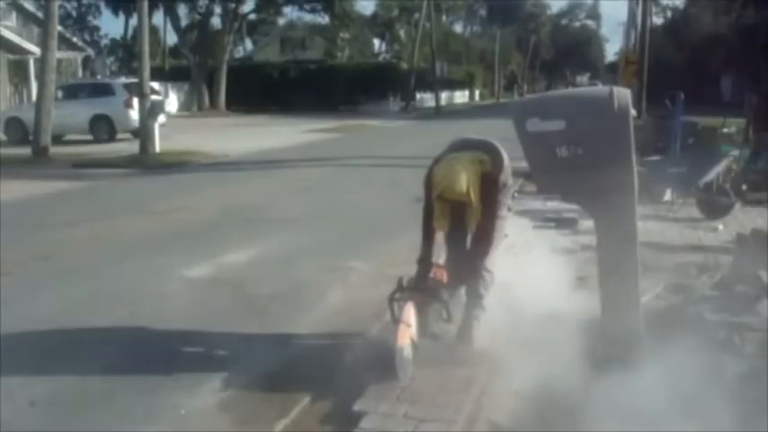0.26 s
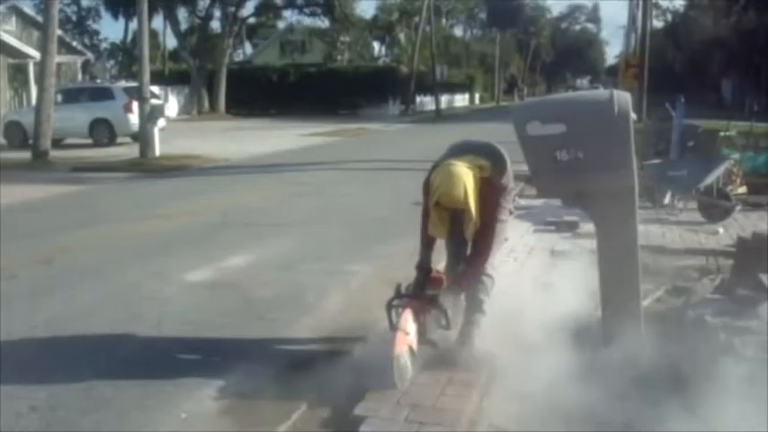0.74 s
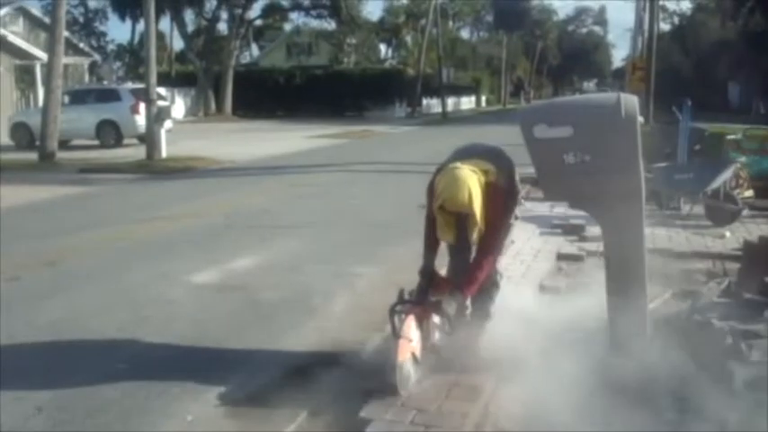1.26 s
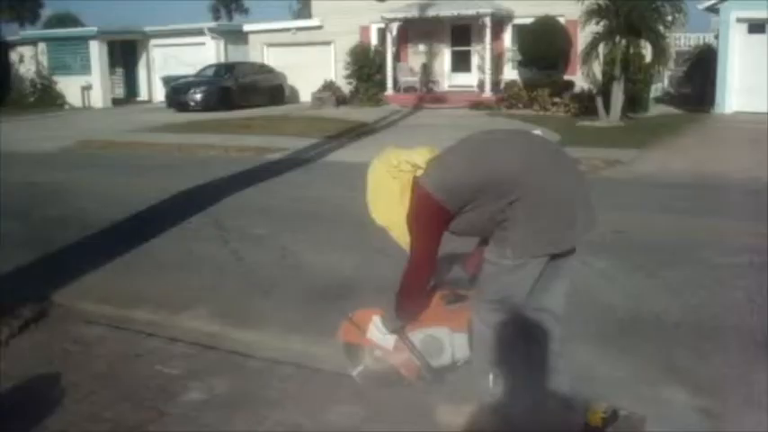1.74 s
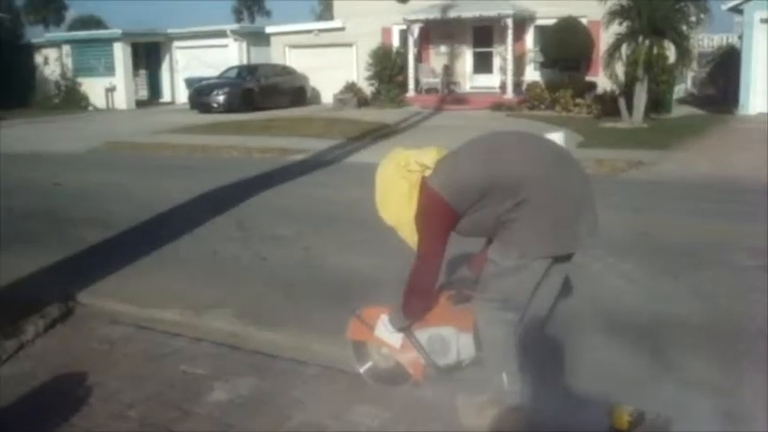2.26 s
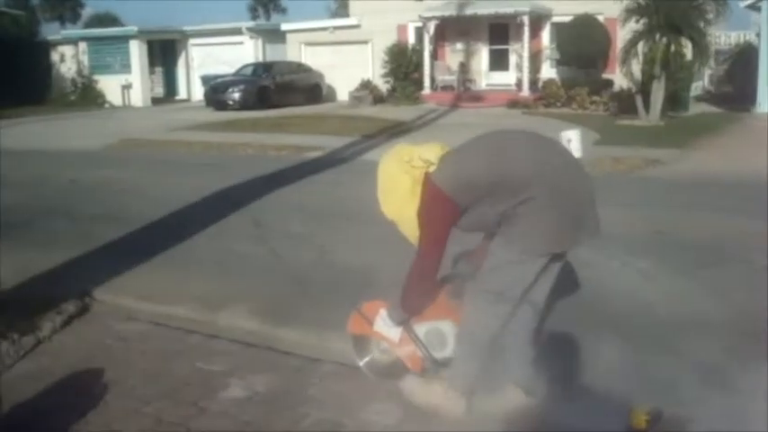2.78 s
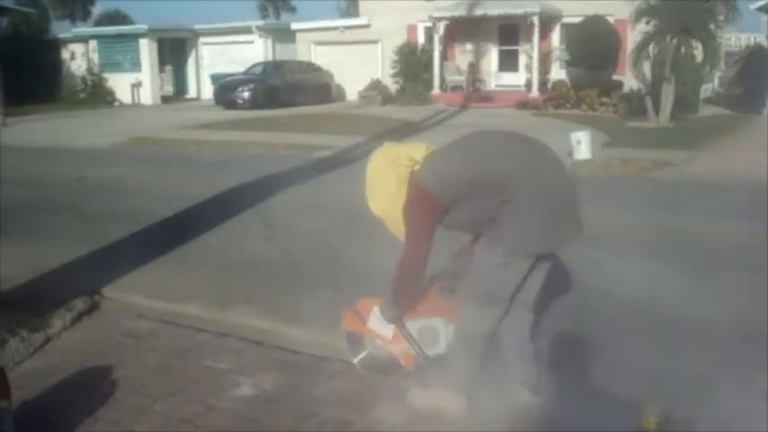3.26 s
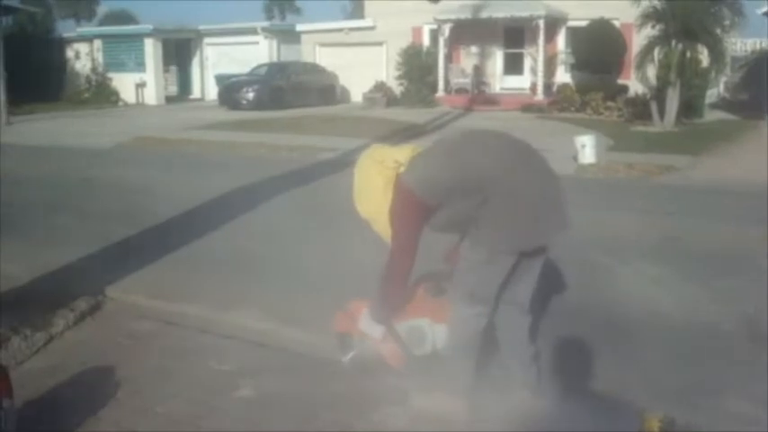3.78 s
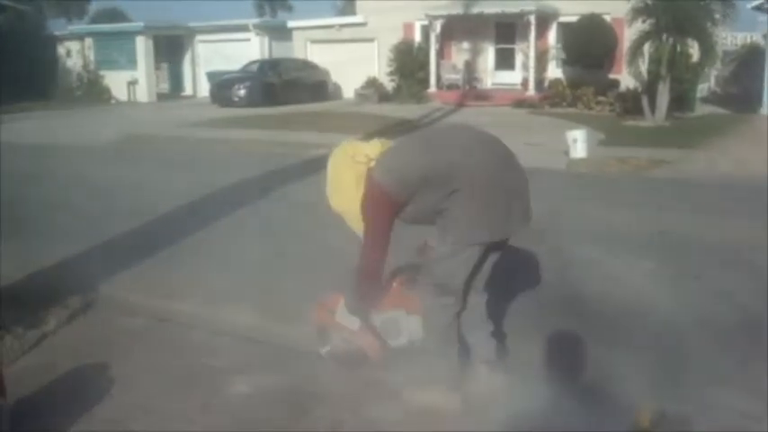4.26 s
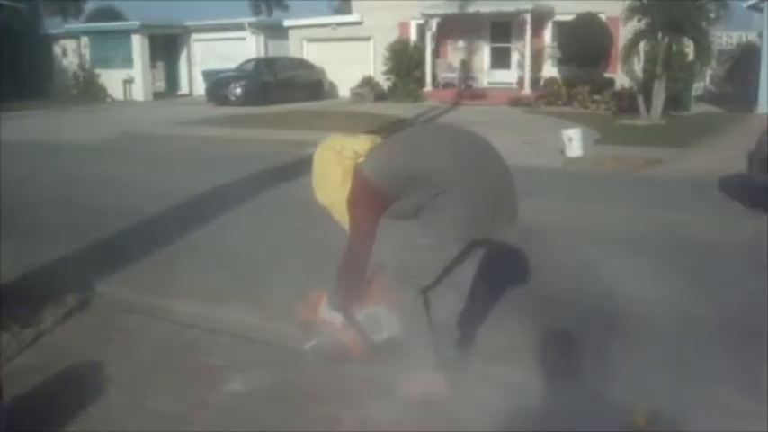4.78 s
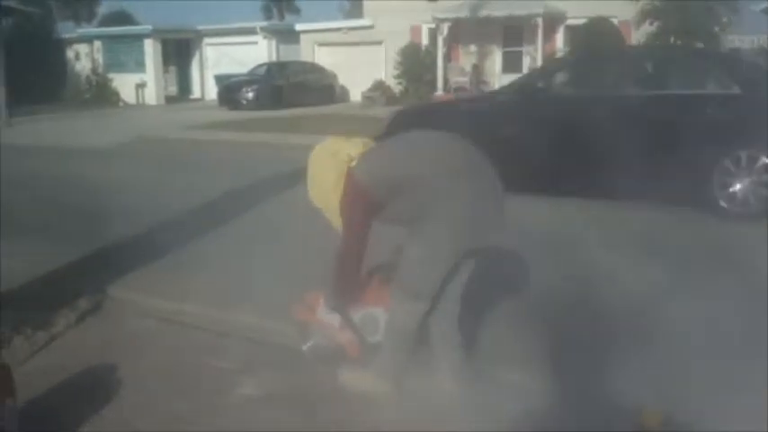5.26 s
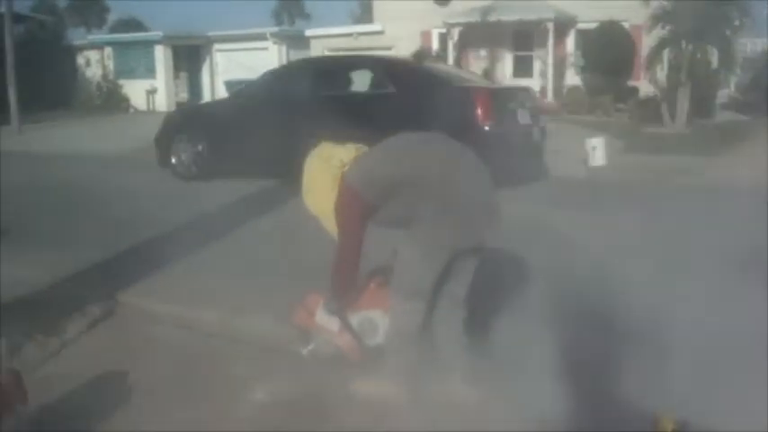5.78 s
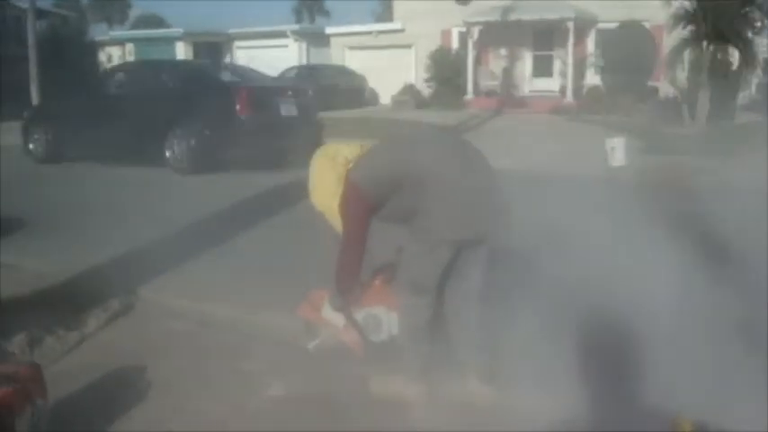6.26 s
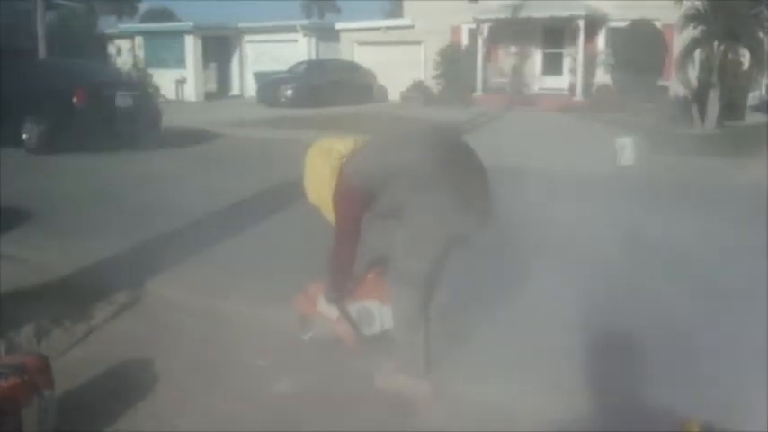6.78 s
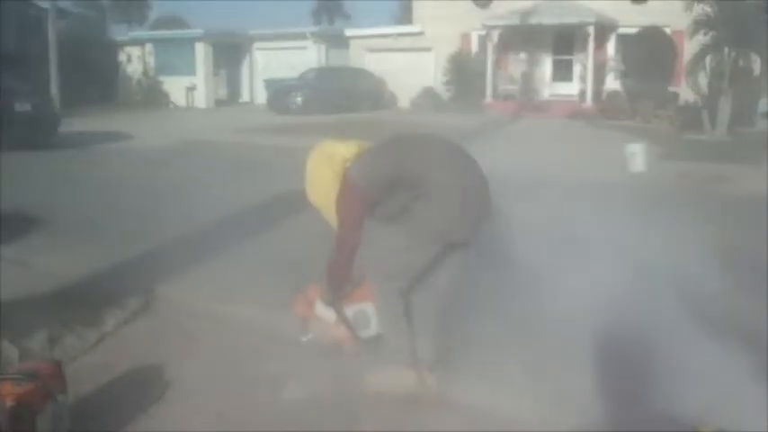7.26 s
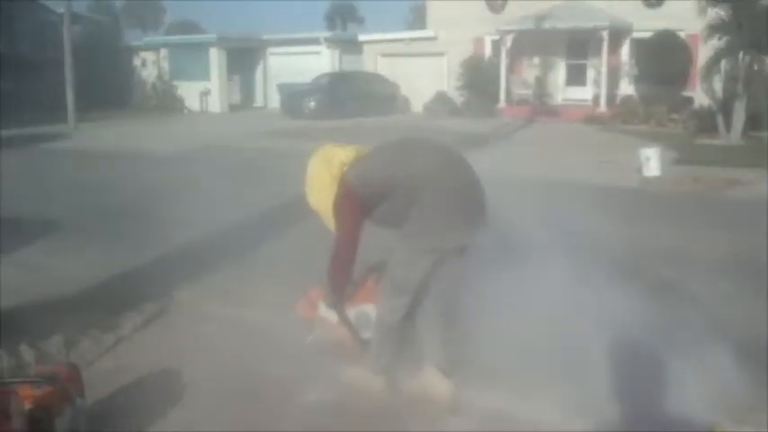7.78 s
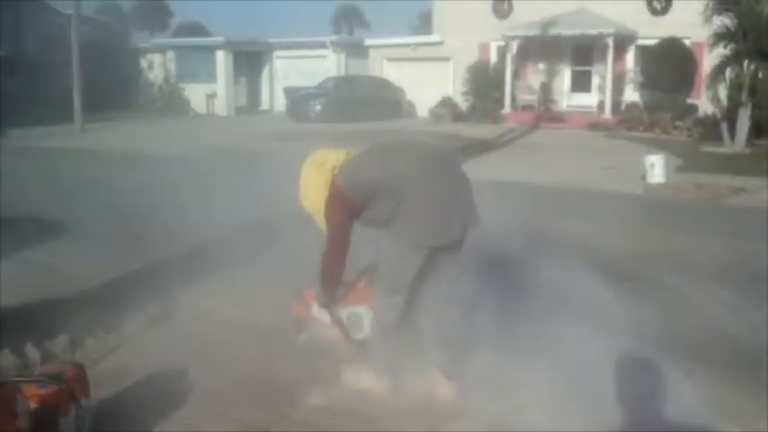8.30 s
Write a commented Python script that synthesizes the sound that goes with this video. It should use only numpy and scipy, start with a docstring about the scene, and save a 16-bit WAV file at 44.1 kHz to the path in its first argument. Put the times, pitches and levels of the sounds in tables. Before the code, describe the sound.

On an open street, a petrol cut-off saw is already running fast and grinding concrete, close to the microphone, with only faint short reflections. From 0 to 1.8 s it is heard from the front: a raspy two-stroke buzz near 110 firings per second, crackling exhaust, dense metallic grinding and screeches around 0.5, 0.65 and 1.5 s. At about 1.8 s the position cuts to the side; the timbre shifts and exhaust cracks soften. The engine repeatedly picks up and sags with a stuttering limiter, about twice a second, while blade screeches and spurts of hissing grit flicker above. After 5.3 s the slot is deeper and the ringing changes colour. A nasal housing howl near 1 kHz strengthens from about 6.2 s. From 7 s the blade thrums lower and revs climb towards 130; a piercing squeal near 4 kHz swells after 8 s. It ends at 8.5 s, still cutting.

```python
"""An open street, where a two-stroke cut-off saw grinds through concrete; the microphone is in front, then beside it.
The engine picks up and sags as its limiter drops sparks: tones, gas noise and cracks follow each firing.
Noisy grinding force rings resonances of the steel blade and its guard, and from the side the housing howls.
As the slot deepens the blade starts to thrum and squeal, from sines tied to its spin."""
import sys
import numpy as np
from scipy import signal
from scipy.fft import rfft, irfft, next_fast_len
from scipy.io import wavfile
from scipy.ndimage import uniform_filter1d

SR = 44100
rng = np.random.default_rng(int(sys.argv[2]) if len(sys.argv) > 2 else 0)


def store_wav(level_fs):
    """Save 16-bit WAV to argv[1]."""
    pcm = np.round(np.clip(np.atleast_2d(level_fs), -1, 1) * 32767)
    wavfile.write(sys.argv[1], SR, pcm.T.astype(np.int16))


N = 376162
TIME = np.arange(N) / SR
BELT_RATIO = .3575   # blade turns per firing


def from_db(db):
    """Amplitude factor of a level in dB."""
    return 10 ** (np.asarray(db) / 20)


def rms_one(x):
    """Scales a signal to rms 1."""
    return x / np.sqrt(np.mean(x ** 2) + 1e-20)


def in_time(rows):
    """Each column of a curve, sample by sample."""
    s, *columns = np.transpose(rows)
    return [np.interp(TIME, s, c) for c in columns]


def swells(rows):
    """The level change in dB from a table of (middle, length, dB) events; each comes and goes like a bell."""
    return sum(db * np.exp(-(2 * (TIME - s) / length_s) ** 2) for s, length_s, db in rows)


def drift(rate_hz):
    """Slow random wandering of rms about 1, made at one fortieth of the sample rate."""
    r = np.exp(-80 * np.pi * rate_hz / SR)
    white = rng.standard_normal(N // 40 + 2002)
    slow = signal.lfilter([1], [1, -2 * r, r * r], white)[2000:]   # the settling start is left out
    return np.interp(np.arange(N) / 40, np.arange(len(slow)), rms_one(slow))


def resonate(x, hz, width_hz):
    """One resonance with gain 1 on top."""
    r = np.exp(-np.pi * width_hz / SR)
    feedback = [1, -2 * r * np.cos(2 * np.pi * hz / SR), r * r]
    return signal.lfilter(np.array([1, 0, -1]) * (1 - r * r) / 2, feedback, x)


def resonate_twice(x, hz, width_hz):
    """Two passes give a resonance steep skirts."""
    return resonate(resonate(x, hz, width_hz), hz, width_hz)


MOVE_S = 1.79   # the microphone's place changes from front to side


def by_place(front, side):
    """The front value until the microphone's place changes, the side value after, with a 22 ms crossfade."""
    moved = np.clip((TIME - MOVE_S) / 0.022 + .5, 0, 1)
    return front + (side - front) * moved


def coloured(white, spectrum):
    """Gives unit white noise the spectrum that is heard at each microphone place."""
    hz, *columns = np.transpose(spectrum)
    size = next_fast_len(N)
    log_hz = np.log(np.arange(size // 2 + 1) * SR / size + 1)
    bins = rfft(white, size) * np.sqrt(SR / 2)
    gains = [from_db(np.interp(log_hz, np.log(hz), levels)) for levels in columns]
    return by_place(*[irfft(bins * gain, size)[:N] for gain in gains])


def bounced(x, echo=0.23, sway_s=.00006):
    """Reflections from road, kerb and body, on paths some 0.8 to 4.5 m longer; their ripples shift as the saw sways."""
    delays_s = (.0023, .0043, .0079, .0132)
    echoes = np.zeros(N)
    for delay in delays_s:
        lag = np.round((delay + sway_s * drift(1.5)) * SR).astype(int)
        echoes += x[np.arange(N) - lag]
    return (x + echo * echoes) / np.sqrt(1 + len(delays_s) * echo ** 2)


# surges of the engine, which sags on its limiter from each one to the next:
# (start [s], length [s], firing rate at start [Hz], firing rate at end [Hz]), before smoothing
ENGINE_SURGES = [(0.15, 0.1, 110.2, 112.2), (0.57, 0.2, 111.2, 114.4), (1.03, 0.39, 112.4, 115.5),
                 (1.76, 0.1, 112.2, 117.1), (2.07, 0.28, 114.9, 120.2), (2.73, 0.33, 116.6, 119.8),
                 (3.41, 0.19, 117.7, 120.2), (3.89, 0.29, 116.6, 121.2), (4.63, 0.24, 115.9, 120.1),
                 (5.13, 0.27, 117.3, 120.8), (5.71, 0.24, 118.4, 121.0), (6.27, 0.3, 117.6, 122.5),
                 (6.75, 0.22, 120.9, 124.9), (7.25, 0.54, 121.3, 127.6), (8.06, 0.35, 124.6, 130.6)]
FLYWHEEL_S = .05


def crankshaft():
    """Firings per s: a straight climb through each surge, a straight sag to the next, rounded by the flywheel."""
    corners = []
    for s, length_s, from_hz, to_hz in ENGINE_SURGES:
        corners += [(s, from_hz), (s + length_s, to_hz)]
    return uniform_filter1d(in_time(corners)[0], size=int(FLYWHEEL_S * SR))


def firing_strength(turns, pull, skip=0.82, rough=0.045):
    """Strength of each firing: as the engine sags, the limiter weakens about every third one by a dropped spark."""
    cycle = turns.astype(int)
    dropped = np.zeros(4096)
    gaps = rng.choice([2, 3, 4], 1000, p=[.03, .94, .03])   # firings from one drop to the next
    dropped[np.cumsum(gaps)] = 1
    limiting = np.clip(.4 - pull, 0, 1)
    unevenness = 1 + rough * rng.standard_normal(len(dropped))[cycle]
    strength = (1 - skip * limiting * dropped[cycle]) * unevenness
    return rms_one(uniform_filter1d(strength, size=150))


def muffler(hz=598, width_hz=16, front_db=-51, side_db=-59):
    """Gas keeps the muffler's cavity humming at its own fixed pitch: noise through a narrow resonance."""
    hum = resonate_twice(rng.standard_normal(N), hz, width_hz)
    return rms_one(hum) * by_place(from_db(front_db), from_db(side_db))


# how hard the engine shakes the housing, before a slow waver: (time [s], level [dB])
HOUSING_SHAKE = [(1.8, -47), (2.15, -44.5), (2.55, -41), (3.05, -52), (3.75, -47), (4.42, -39), (4.8, -50),
                 (5.9, -42), (6.25, -35), (6.95, -36.5), (7.45, -38.5), (7.8, -36.5), (8.53, -39)]
HOUSING_HZ = 986
HOWL_ORDER, SIDE_TONE_ORDER = 8, 8 + 1 / 3   # multiples of the firing rate


def housing(turns, pull, width_hz=28, eighth_db=3, rattle_db=-51, waver_db=1.0):
    """From the side, a sharp resonance howls as the eighth order, or the side tone of dropped sparks, sweeps through."""
    firing = np.clip(.5 + pull, 0, 1)
    eighth = from_db(eighth_db) * (1 + firing) / 2 * np.sin(2 * np.pi * HOWL_ORDER * turns)
    side_tone = (1 - firing) * np.sin(2 * np.pi * SIDE_TONE_ORDER * turns)
    shake = from_db(in_time(HOUSING_SHAKE)[0] + waver_db * drift(4.4))
    drive = np.sqrt(2) * (eighth + side_tone) * shake
    ring = resonate_twice(drive, HOUSING_HZ, width_hz)
    rattle = resonate_twice(rng.standard_normal(N), HOUSING_HZ, width_hz)
    return by_place(0, ring + from_db(rattle_db) * rms_one(rattle))


# exhaust tones, before load and trim: (multiple of the firing rate, front level [dB], side level [dB])
EXHAUST_TONES = [(1, -68, -68.5), (2, -57.5, -61), (3, -61, -58.5), (4, -54.5, -54.5), (5, -49.5, -47),
                 (6, -46, -64.5), (7, -55.5, -53.5), (8, -57, -50.5), (9, -53.5, -52), (10, -53.5, -58.5),
                 (11, -66.5, -75), (12, -60, -63), (13, -58, -58), (14, -64, -53.5), (15, -60, -74),
                 (16, -67, -51), (17, -64, -55), (18, -55, -54), (19, -71, -49.5), (20, -73, -50)]
# rush of exhaust gas and cooling air, before trim:
# (frequency [Hz], front level [dB per Hz], side level [dB per Hz])
GAS_RUSH = [(25, -102, -108), (80, -100, -102), (161, -90, -88), (221, -88, -91), (292, -75, -80.5),
            (360, -87, -84.5), (503, -72.5, -78.5), (648, -70.5, -72.5), (710, -64.5, -71),
            (834, -75.5, -73.5), (890, -68.5, -70.5), (1140, -77.5, -79), (1370, -74, -87.5),
            (3000, -105, -105)]
# brief swells of the exhaust rush, and one slight dip: (middle time [s], length [s], level change [dB])
RUSH_SWELLS = [(0.38, .08, 3.5), (1.28, .15, 1.5), (1.59, 0.062, 2.5), (3.68, 0.068, -1), (4.42, .15, 0.5),
               (6.15, 0.28, 3.5), (7.15, .08, 1), (7.88, 0.17, 3), (8.11, .1, 3.5)]


def engine(turns, strength, pull, clean_db=-0.4, load_swing_db=2.0, tones_db=0.55, rush_db=-0.33,
           bang_db=1.76, sag_rush_db=0.8, rush_db_per_s=0.44):
    """Exhaust tones, the low ones fullest while the engine pulls, over a rush of gas that puffs with each firing."""
    tones = np.zeros(N)
    load_share = {2: .6, 3: 1.5, 4: .6}   # the second to fourth orders swing most with the load
    for order, front_db, side_db in EXHAUST_TONES:
        wave = np.sin(2 * np.pi * (round(order) * turns + rng.random()))
        swing_db = pull * (clean_db + load_swing_db * load_share.get(round(order), 0))
        tones += wave * by_place(from_db(front_db), from_db(side_db)) * from_db(swing_db + drift(2.5))
    # now and then a charge of unburnt fuel makes one puff bang
    charge = np.minimum(rng.exponential(1, 4096), 3.5)[turns.astype(int)]
    port_open = np.sin(np.pi * turns) ** 8
    gas = rms_one(from_db(port_open * strength * (2.5 + bang_db * charge)))
    rush = coloured(rng.standard_normal(N) * gas, GAS_RUSH)
    # the rush grows through the cut, rises in each sag, and briefly swells or dips
    growth_db = rush_db_per_s * (TIME - TIME.mean())
    level_db = rush_db + growth_db - sag_rush_db * pull + swells(RUSH_SWELLS)
    return from_db(tones_db) * strength * tones + from_db(level_db) * rush


def cracks(turns, strength, share=.7, hz=2150, width_hz=1100, length_s=0.00065, size_db=1.0,
           front_db=-41, side_db=-48):
    """Most firings burst from the port with a short, hard crack: decaying noise through a broad resonance."""
    opens = np.diff(np.floor(turns + .5), prepend=0) > 0
    loudness = from_db(size_db * np.minimum(rng.exponential(1, N), 3))
    sizes = opens * (rng.random(N) < share) * strength * loudness
    burst = signal.lfilter([1], [1, -np.exp(-1 / (length_s * SR))], sizes + 1e-18)
    crack = resonate_twice(burst * rng.standard_normal(N), hz, width_hz)
    return rms_one(crack) * by_place(from_db(front_db), from_db(side_db))


USUAL_FIRING_HZ = 119


def spun(x, turns, rise_per_hz=.001):
    """A wave that runs with the spin rises in pitch as the engine speeds up."""
    return np.interp(TIME + rise_per_hz * (turns - USUAL_FIRING_HZ * TIME), TIME, x)


# thrum of the slightly warped blade: (multiple of the blade's turning rate, level once pinched [dB])
BLADE_THRUM = [(2, -71), (4, -69), (6, -80), (8, -75)]
# squeal of the blade pinched in the slot: (time [s], level [dB])
BLADE_SQUEAL = [(0, -83), (7.3, -65.5), (7.8, -58), (8.1, -43.5), (8.3, -38), (8.48, -39), (8.53, -31.5)]


def pinched_blade(turns, start_s=6.9, rise_s=0.89):
    """Deep in the slot the blade thrums at even multiples of its turning, and friction sustains a travelling wave."""
    thrum = np.zeros(N)
    for multiple, db in BLADE_THRUM:
        cycles = round(multiple) * BELT_RATIO * turns + rng.random()
        thrum += from_db(db) * np.sin(2 * np.pi * cycles)
    squeal_hz = TRAVELLING_WAVES[0][0] + 7 * drift(40)   # the lowest wave, slightly unsteady
    squeal = np.sin(2 * np.pi * np.cumsum(squeal_hz) / SR) * from_db(3.0 * drift(25))
    pinch = (1 + np.tanh((TIME - start_s) / rise_s)) / 2
    return np.sqrt(2) * thrum * pinch + spun(rms_one(squeal), turns) * from_db(in_time(BLADE_SQUEAL)[0])


def puffs(turns, sharpness):
    """One rounded burst a turn, rms 1."""
    return rms_one(np.exp(sharpness * np.cos(2 * np.pi * turns)))


SEGMENT_COUNT = 16   # cutting segments on the rim


def contact(blade_turns, turns, segment_depth=0.21, firing_depth=0.16, warp_depth=0.041, judder_db=0.85,
            chips_per_s=45, chip_db=1.5, chip_s=0.0014):
    """Grinding force: segments strike in turn, firings and the blade's warp jerk the rim, and chips break out."""
    sizes = np.minimum(rng.exponential(1, N), 4) * (rng.random(N) < chips_per_s / SR)
    chips = signal.lfilter([1], [1, -np.exp(-1 / (chip_s * SR))], sizes + 1e-18)
    segments = puffs(SEGMENT_COUNT * blade_turns, segment_depth)
    beat = segments * puffs(blade_turns, warp_depth) * puffs(turns, firing_depth)
    return rms_one(beat * from_db(judder_db * drift(43) + chip_db * chips))


DEEP_S = 5.28   # the blade sinks deep into the slot


def ringing(force, modes, wander_db):
    """Grit excites every mode; each swells and fades as the contact point shifts."""
    depth = np.clip(TIME - DEEP_S + .5, 0, 1)
    out = np.zeros(N)
    for hz, width_hz, front_db, shallow_db, deep_db in modes:
        ring = resonate_twice(force * rng.standard_normal(N), hz, 1.25 * width_hz)
        ring = ring * (1 + (from_db(wander_db) - 1) * drift(9.0))
        side = from_db(shallow_db) + (from_db(deep_db) - from_db(shallow_db)) * depth
        out += rms_one(ring) * by_place(from_db(front_db), side)
    return out


# standing modes of the steel blade; ringing() widens them, and feed and trims shift the levels:
# (frequency [Hz], width [Hz], front level [dB], side level in a shallow slot [dB], in a deep slot [dB])
BLADE_MODES = [(2945, 103, -38, -41, -41), (3100, 56, -38, -40, -42), (3190, 51, -48, -40, -36),
               (3285, 25, -45, -46, -41), (3325, 47, -44, -45, -40), (3436, 22, -43, -44, -43),
               (3512, 75, -36, -54, -59), (3654, 44, -60, -47, -45), (3732, 110, -47, -41, -41),
               (3938, 22, -52, -47, -44), (3974, 21, -41, -47, -45), (4048, 47, -54, -43, -46),
               (4483, 21, -53, -42, -44), (4558, 31, -47, -41, -45), (4839, 38, -48, -42, -41),
               (5308, 35, -39, -39, -54), (5348, 28, -46, -43, -45), (5526, 53, -58, -52, -46),
               (6213, 39, -58, -56, -48), (6466, 30, -45, -49, -51), (6636, 103, -59, -49, -45),
               (7360, 110, -40, -49, -47), (7680, 45, -49, -50, -52), (7896, 64, -54, -52, -49),
               (8308, 33, -51, -51, -49), (8605, 79, -58, -50, -46)]
# modes of the blade guard, same columns
GUARD_MODES = [(1771, 86, -45.5, -44.5, -43.5), (1939, 110, -43.5, -48, -45), (2263, 51, -48, -50, -51),
               (2459, 104, -48, -45, -45), (2648, 99, -51, -46, -44)]
# waves that run round the blade with its spin, same columns, at the usual engine speed
TRAVELLING_WAVES = [(4125, 24, -43, -47, -42), (4649, 52, -34, -38, -37), (5149, 53, -38, -36, -40),
                    (5796, 110, -37, -41, -38)]
# rasp of crushed concrete, before feed: (frequency [Hz], front level [dB per Hz], side level [dB per Hz])
CONCRETE_RASP = [(960, -105, -105), (1580, -86, -73), (2050, -73, -94), (2860, -68.5, -67.5),
                 (3400, -66, -66.5), (4380, -61.5, -71.5), (5320, -61, -64.5), (7100, -91, -100)]
# hiss of flying grit, same columns
GRIT_SPRAY = [(3900, -108, -100), (5600, -62.5, -76), (5930, -62, -68.5), (6850, -64, -69),
              (7800, -62, -69.5), (8600, -66.5, -69), (9930, -68, -66.5), (10180, -93, -87.5)]
# steady grinding as the slot deepens, before trims:
# (time [s], bite of the rim [dB], rub of the blade's flank [dB], spray of grit [dB])
STEADY_FEED = [(0.0, 0.5, -5.5, -4.5), (1.7, -0.1, -1.5, -3), (1.9, 0.3, -2, -5.5), (3.5, 0, -0.5, -5),
               (3.8, 1, -1, -2), (5.1, 0.5, -1.5, -3.5), (5.5, 0.8, 0, -4), (6.75, 0.3, -2, -2.9),
               (8.53, 0.8, 2.3, -2.5)]
# the rim bites harder: (middle time [s], length [s], added level [dB])
RIM_BITES = [(0.43, 0.21, 1), (0.646, 0.071, 2), (0.78, .08, 2), (1.093, 0.33, 2), (1.464, 0.47, 1.8),
             (2.307, .14, 1.5), (3.725, 0.051, 2), (4.27, .11, 0.9), (6.068, 0.21, 1.5), (7.02, 0.059, 1.5),
             (8.52, 0.037, 3.5)]
# the blade's flank screeches against the wall of the slot, same columns
FLANK_SCREECHES = [(0.18, .07, 3), (0.46, 0.17, 6), (0.65, 0.2, 9), (1.176, 0.065, 6), (1.522, .05, 8),
                   (1.914, 0.18, 9.5), (2.242, 0.13, 5.5), (2.408, 0.15, 5), (3.153, 0.078, 6),
                   (3.892, 0.22, 6.5), (4.23, 0.092, 4), (4.387, 0.083, 3.5), (4.7, .12, 0.5),
                   (5.05, .14, 2.5), (5.272, .13, 4.5), (5.62, .06, 5.5), (5.972, .11, 4.5),
                   (6.39, 0.042, 4), (6.57, 0.12, 4.5), (6.828, 0.1, 4.5), (7.067, 0.14, 2),
                   (7.36, 0.042, 4.5), (7.61, 0.053, 3), (8.076, .07, 3.5), (8.52, 0.064, 1)]
# spurts of grit leave the slot, same columns
GRIT_SPURTS = [(0.42, .24, 2.5), (0.81, 0.14, 2), (1.25, .05, 1.5), (1.665, .06, 3.5), (3.18, .1, 2.2),
               (3.773, 0.13, 2), (4.464, .13, 2), (4.6, .06, 3), (5.38, 0.38, 2.4), (5.63, .13, 1.3),
               (6.08, 0.29, 2), (6.45, .09, 2.5), (6.83, 0.079, 3), (7.13, .1, 2), (7.376, 0.12, 2.2),
               (7.666, .08, 2.8), (7.877, 0.14, 1.5), (8.21, 0.15, 2), (8.497, .12, 3.5)]


def grinding(turns, rim_db=-1.63, flank_db=-0.84, travelling_db=0.0, grit_db=0.5, unsteady_db=-0.14):
    """The rim rings the low modes, the rubbing flank the middle ones, the grit spray the highest."""
    steady_bite_db, steady_rub_db, steady_spray_db = in_time(STEADY_FEED)
    bite_db = steady_bite_db + swells(RIM_BITES)
    screech_db = steady_rub_db + swells(FLANK_SCREECHES) + unsteady_db * drift(11)
    spray_db = steady_spray_db + swells(GRIT_SPURTS)
    force = contact(BELT_RATIO * turns, turns)
    low = GUARD_MODES + [m for m in BLADE_MODES if m[0] < 4300]
    middle = [m for m in BLADE_MODES if 4300 <= m[0] < 6100]
    high = [m for m in BLADE_MODES if m[0] >= 6100]
    rasp = bounced(coloured(force * rng.standard_normal(N), CONCRETE_RASP))
    rim = ringing(force, low, wander_db=1.0) + rasp
    travelling = spun(ringing(force, TRAVELLING_WAVES, wander_db=1.0), turns)
    flank = ringing(force, middle, wander_db=1.0) + from_db(travelling_db) * travelling
    hiss = bounced(coloured(force * rng.standard_normal(N), GRIT_SPRAY))
    grit = ringing(force, high, wander_db=5.0) + hiss
    cut = rim * from_db(bite_db + rim_db) + flank * from_db(screech_db + flank_db)
    return cut + grit * from_db(spray_db + grit_db)


STUMBLE_TURNS = .012   # how far dropped sparks throw the crankshaft out of step, in firing cycles


def scene():
    """One crankshaft drives exhaust, housing and blade; both channels are alike."""
    firing_hz = crankshaft()
    pickup = uniform_filter1d(np.gradient(firing_hz) * SR, size=3000)   # Hz per s
    pull = np.tanh(pickup / 8)   # positive as the engine picks up, negative as it sags
    stumble = STUMBLE_TURNS * np.clip(-pull, 0, 1) * drift(25)
    turns = np.cumsum(firing_hz + .12 * drift(27)) / SR + stumble   # one per firing
    strength = firing_strength(turns, pull)
    street = muffler() + housing(turns, pull)
    street += engine(turns, strength, pull) + cracks(turns, strength)
    street += pinched_blade(turns) + grinding(turns)
    return np.array([street, street])


CUTOFF_HZ = 10120


def record(dry):
    """The treble is cut steeply above the cutoff."""
    return signal.sosfilt(signal.ellip(14, .1, 85, CUTOFF_HZ, fs=SR, output="sos"), dry)


dry = scene()
out = record(dry)
store_wav(out)
```